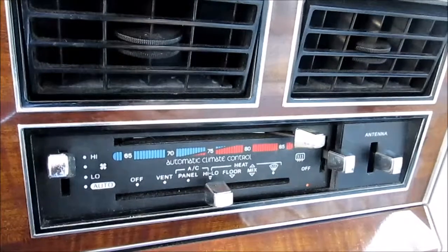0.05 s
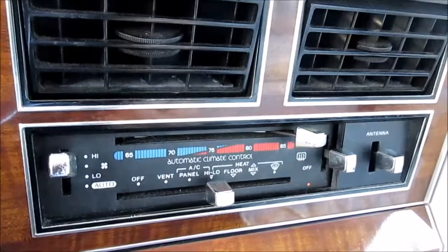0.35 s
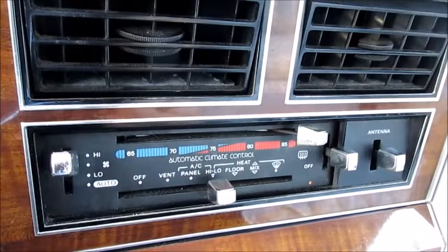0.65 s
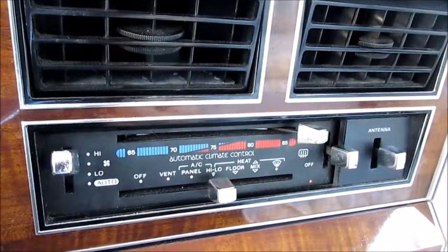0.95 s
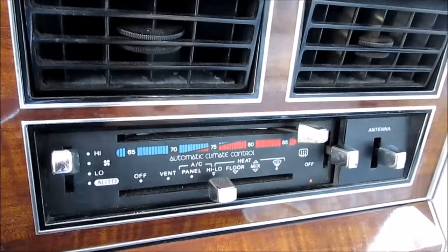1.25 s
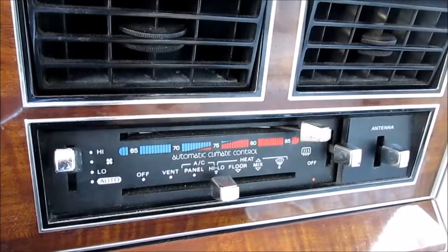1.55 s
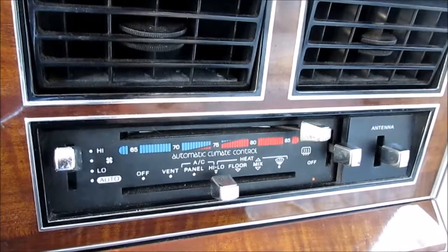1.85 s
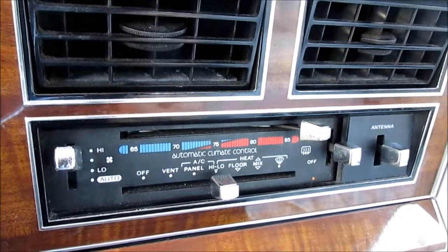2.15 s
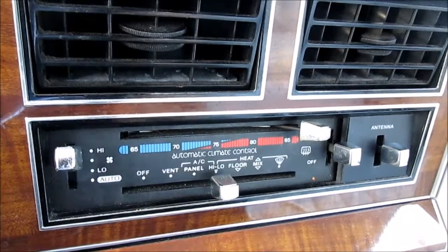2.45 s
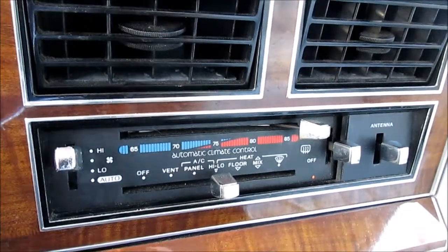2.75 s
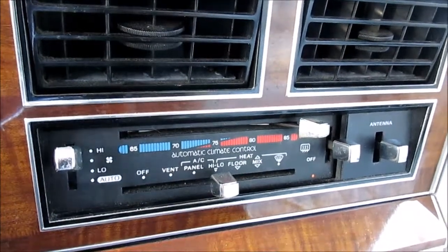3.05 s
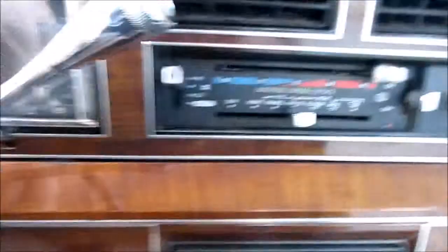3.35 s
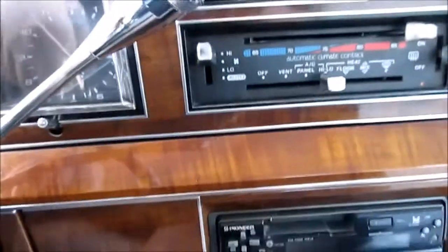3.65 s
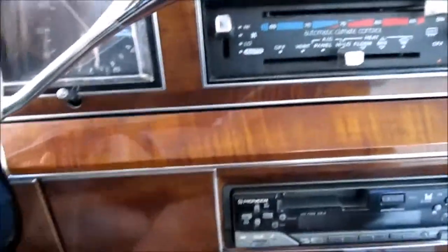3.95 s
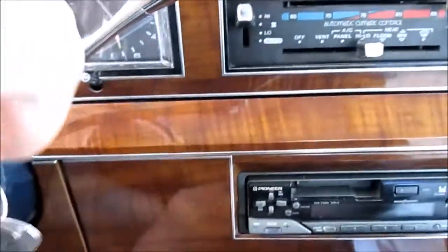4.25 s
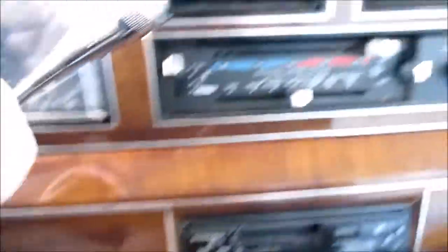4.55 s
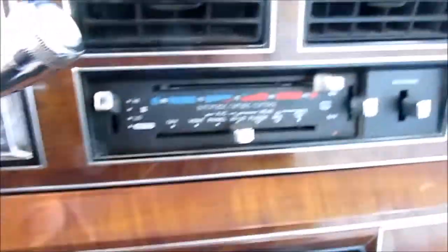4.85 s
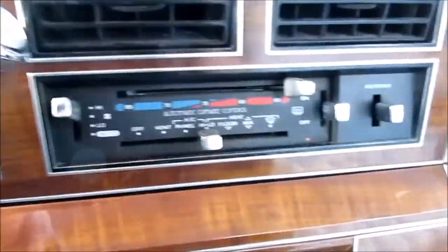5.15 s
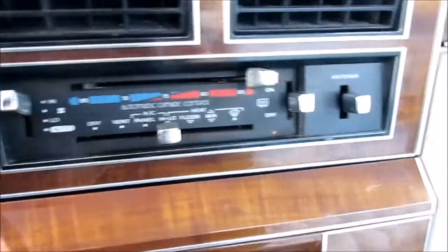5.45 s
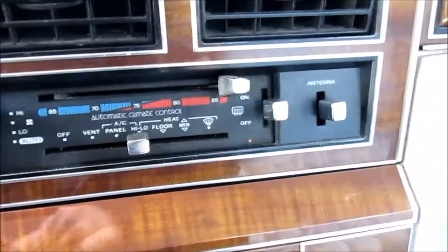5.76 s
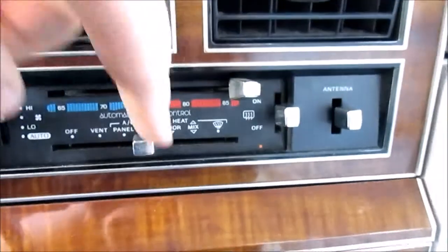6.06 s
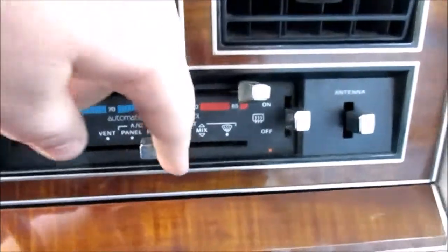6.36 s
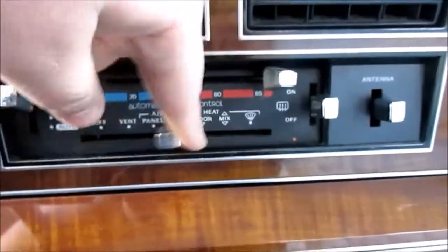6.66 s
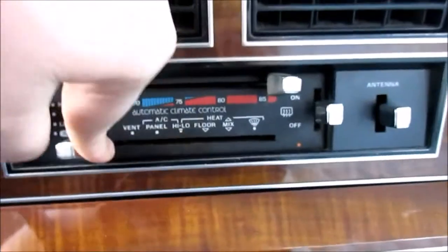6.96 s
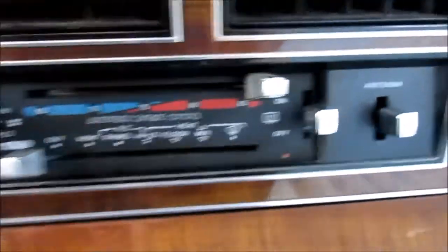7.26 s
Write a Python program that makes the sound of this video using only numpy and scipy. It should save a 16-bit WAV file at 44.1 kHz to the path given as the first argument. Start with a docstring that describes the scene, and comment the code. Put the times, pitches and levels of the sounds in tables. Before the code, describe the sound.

A steady rush of air from a car's dashboard vents covers the hum of the idling engine, with the microphone just in front of the controls. After a brief dropout, keys clink and the ignition lock clicks; the engine stalls with a thud and the blower fades away. The keys tinkle to rest. Then a sliding heater lever rattles through its notches, knocking the hollow dashboard, and a valve hisses faintly.

```python
"""In a parked car the heater blower rushes through the dashboard vents over the idling engine. The listener
moves beside the vents; the sound drops out briefly and returns with a tick. Keys jingle, the ignition lock
clicks off, the engine shudders to a stall and the fan coasts down. In the quiet cabin a finger pushes the
heater lever through its detents to the end stop, knocking the hollow dashboard; the lever's vacuum valve opens
and hisses."""
import sys
import numpy as np
from scipy import signal
from scipy.fft import irfft, next_fast_len
from scipy.io import wavfile
from scipy.ndimage import uniform_filter1d

SR = 44100
rng = np.random.default_rng(int(sys.argv[2]) if len(sys.argv) > 2 else 0)


def output_pcm(signal):
    """Save a mono or channel-first signal as 16-bit PCM at the path in sys.argv[1].

    Samples are clipped to [-1, 1] before scaling.
    """
    pcm = np.clip(np.atleast_2d(signal).T, -1, 1) * 32767
    wavfile.write(sys.argv[1], SR, np.round(pcm).astype(np.int16))


N = 322371
TIME = np.arange(N) / SR
HIT_N = round(SR * 0.26)
HIT_TIME = TIME[:HIT_N]
GAP_START_S, GAP_END_S = 3.028, 3.263
KEY_OFF_S, FAN_OFF_S = 4.17, 4.354
KEY_DAMPING = 0.3  # share of the free ring time left to touching keys

# Stereo width in the cabin. Each row: frequency in Hz, side minus mid in dB.
WIDTH = [(60, -29), (200, -24), (650, -18.5), (1300, -7.5), (2400, -7), (4400, -3), (8000, 0.5),
         (15000, -6)]
# Spectra of low rumble, dashboard hollow, lock snap and key contact.
# Each row: frequency in Hz, density in dB.
RUMBLE_COLOUR = [(25, -12), (50, -7), (95, -2.5), (140, -5.5), (160, -6.5), (190, 0), (250, -1.5),
                 (300, -10.5), (370, -7.5), (440, -15), (600, -18), (1200, -69.5)]
BOOM_COLOUR = [(100, -14), (300, -14), (420, -9), (530, -0.5), (850, -6.5), (1200, -13.5), (2000, -19),
               (6000, -39)]
LOCK_COLOUR = [(700, -15), (1050, 7), (1500, 10.5), (2100, 3), (2600, 11.5), (3200, 4.5), (6000, 5.5),
               (9000, -0.5), (14000, -1.5), (16000, -15)]
KEY_COLOUR = [(1500, -12), (4000, -9), (6500, -2.5), (7400, -6), (8400, 0), (9400, -2.5), (10400, -9),
              (11200, 3), (12000, -4), (13800, -1), (16000, -7)]
# Keys knocking together. Each row: start in s, tick in dB, ring in dB, ring time factor, struck part.
KEY_HITS = [(3.863, -26, -31.5, 1.2, "short key"), (3.880, -26, -28, 0.58, "long key"),
            (4.101, -42, -40, 0.92, "long key"), (4.184, -35, -47, .5, "tag"),
            (4.327, -25, -23, 1.2, "long key"), (4.345, -15.5, -33, 0.81, "short key"),
            (4.525, -22.5, -20.5, 0.85, "short key"), (4.550, -45, -26, 0.32, "tag"),
            (4.576, -48, -55, 0.43, "tag"), (4.639, -40, -40, 0.76, "tag"), (4.695, -30, -46, 1.1, "ring"),
            (4.774, -59, -43, 0.89, "tag"), (4.817, -56, -49, 0.78, "tag"),
            (4.853, -42, -47, 0.46, "long key"), (4.874, -59, -41, 0.51, "tag"),
            (4.891, -55, -49, 0.46, "tag"), (4.945, -60, -46, 0.74, "tag"), (4.994, -66, -58, .7, "tag"),
            (5.011, -65, -68, .5, "tag"), (5.033, -47, -50, .6, "tag"), (5.129, -43, -51.5, .8, "tag"),
            (5.171, -35, -48, .7, "short key"), (5.234, -44, -58, .4, "short key"),
            (5.329, -56, -52, 0.88, "tag"), (5.651, -47, -50, .3, "short key")]
# Modes of the bunch. Each row: frequency in Hz, relative level in dB, free t60 in s, part.
KEY_MODES = [(8115, -9, .25, "long key"), (10985, -1, .18, "long key"), (14180, -2, .22, "long key"),
             (6900, -12, .06, "long key"), (9280, -11, .09, "long key"), (13300, -9, .07, "long key"),
             (5950, -15, .05, "short key"), (8900, -11, .06, "short key"), (11200, -10, .07, "short key"),
             (14050, -8, .07, "short key"), (8230, -9, .08, "short key"), (10230, -24, .18, "short key"),
             (12492, -1, .25, "short key"), (7666, 0, .65, "ring"), (15730, -7, .3, "ring"),
             (6380, -7, .09, "tag"), (8180, -3, .1, "tag"), (9320, -6, .12, "tag"), (11040, -5, .09, "tag"),
             (14260, 2, .13, "tag")]


def undb(db):
    """Decibels to gain."""
    return np.exp(np.asarray(db) * np.log(10) / 20)


def unit(x):
    """Scale to rms 1."""
    return x / np.sqrt(np.mean(x ** 2))


def gain_at(points, hz):
    """Gain of a (Hz, dB) table on a log-frequency axis."""
    points_hz, db = np.transpose(points)
    return undb(np.interp(np.log(hz + 1), np.log(points_hz), db))


def since(start_s):
    """Seconds since start_s, zero before."""
    return np.maximum(TIME - start_s, 0)


def fade(t60_s):
    """Exponential decay of a hit."""
    return np.exp(-np.log(1000) * HIT_TIME / t60_s)


def envelope(start_s, attack_s, hold_s, t60_s):
    """Linear attack, hold, exponential release."""
    release = np.exp(-np.log(1000) * since(start_s + attack_s + hold_s) / t60_s)
    return np.minimum(since(start_s) / attack_s, 1) * release


def swells(rows):
    """Half-sine rise and fall per row."""
    return sum(undb(db) * np.sin(np.pi * np.clip((TIME - start_s) / length_s, 0, 1))
               for start_s, length_s, db in rows)


def walk(rate_hz):
    """Smooth random wander, rms 1."""
    step = int(SR / rate_hz)
    held = rng.standard_normal(1024)[np.arange(N) // step % 1024]
    return unit(uniform_filter1d(uniform_filter1d(held, step), step))


def noise(colour, size=HIT_N, modes=(), modes_db=0, apart=False, balance=None):
    """Coloured stereo noise with resonances, rms 1; bass alike on both sides unless apart."""
    hz = np.fft.rfftfreq(size, 1 / SR)
    peaks = sum(undb(db + modes_db) / (1 + (2 * (hz - centre_hz) / width_hz) ** 2)
                for centre_hz, width_hz, db in modes)
    white = rng.standard_normal((2, 2 * len(hz))).view(complex)
    mid, side = white * np.hypot(gain_at(colour, hz), peaks)
    if not apart:
        side = side * gain_at(WIDTH, hz)
    lean = np.sqrt(gain_at(balance, hz)) if balance else 1
    spectrum = np.array([(mid + side) * lean, (mid - side) / lean], np.complex64)
    return unit(irfft(spectrum, size))


def steady(colour, **options):
    """Scene-long noise."""
    return noise(colour, size=next_fast_len(N, True), **options)[:, :N]


def ring(modes, spread):
    """Decaying modes; higher ones reach the two sides more out of phase."""
    hz, db, t60_s = np.transpose(modes)[:, :, None]
    start_rad, lag_rad = rng.uniform(-np.pi, np.pi, (2, len(modes), 1))
    lag_rad = lag_rad * np.minimum(spread * gain_at(WIDTH, hz), np.pi / 4)
    amplitude = undb(db) * fade(t60_s) / np.sqrt(np.sum(undb(db) ** 2) / 2)
    phase = 2 * np.pi * hz * HIT_TIME + start_rad
    return np.array([np.sum(amplitude * np.sin(phase + side * lag_rad), axis=0) for side in (1, -1)])


def detuned(modes, share):
    """Shift each mode slightly, as the point of contact varies."""
    return [(hz * (1 + share * rng.standard_normal()), db, t60_s) for hz, db, t60_s in modes]


def add(out, start_s, sound):
    """Mix a sound in at start_s."""
    i = int(start_s * SR)
    out[:, i:i + sound.shape[-1]] += sound[..., :N - i]


def panned(sound, left_db):
    """Pan by a left-minus-right level."""
    return sound * undb(np.array([[1], [-1]]) * left_db / 2)


def from_left(sound, lag_s=0.00007):
    """Delay the right side."""
    return np.array([sound[0], np.roll(sound[1], round(lag_s * SR))])


def moved(facing, beside, start_s=2.95, length_s=0.51):
    """Glide a value as the listener moves from facing the vents to beside them."""
    return facing + (beside - facing) * np.clip((TIME - start_s) / length_s, 0, 1)


def buffeted(colour, modes=()):
    """Low noise, alike on both sides at the vents; in the draught each side has its own eddies."""
    apart_share = moved(0.01, 0.54)
    common = np.sqrt(1 - apart_share) * steady(colour, modes=modes)
    return common + np.sqrt(apart_share) * steady(colour, modes=modes, apart=True)


def cabin(level_db=-54, diffuse_db=-3):
    """Faint rumble from outside the car, partly diffuse."""
    # Cabin spectrum. Each row: frequency in Hz, density in dB.
    colour = [(25, -1), (70, 4), (150, -4), (210, 0), (320, -4), (430, -11), (750, -6), (1400, -12),
              (2300, -19), (7000, -19), (15000, -24)]
    rumble = steady(colour) + undb(diffuse_db) * steady(colour, apart=True)
    return unit(rumble) * undb(level_db + walk(58))


def return_tick(level_db=-38, t60_s=0.31):
    """Bright tick at the end of the dropout."""
    out = np.zeros((2, N))
    add(out, GAP_END_S, undb(level_db) * noise(LOCK_COLOUR) * fade(t60_s))
    return out


def thuds(rise_s=0.0014, bump_db=-5):
    """Quickly damped swings of the body panels, with a broad low bump."""
    # Bodywork thuds. Each row: start in s, level in dB, pitch in Hz, t60 in s.
    hits = [(4.241, -17, 112, 0.088), (4.248, -24, 312, 0.034), (4.657, -17, 163, 0.03),
            (5.011, -28.5, 150, 0.05), (5.166, -36, 190, .06), (5.757, -41, 210, 0.075),
            (6.095, -43, 215, .1), (6.812, -29, 264, 0.073), (6.846, -32, 101, 0.14), (6.867, -33, 75, 0.3)]
    out = np.zeros((2, N))
    attack = 1 - np.exp(-HIT_TIME / rise_s)
    for start_s, db, hz, t60_s in hits:
        swing = np.sin(2 * np.pi * hz * HIT_TIME) * fade(t60_s)
        bump = undb(bump_db) * noise(RUMBLE_COLOUR) * fade(0.049)
        add(out, start_s, undb(db) * (swing + bump) * attack)
    return out


def engine(idle_hz=56.7, run_down_s=0.62, fall_db_per_s=15.5, uneven_db=3):
    """Firing orders hum through the bulkhead; the body shudders as the engine stalls."""
    # Hum partials. Each row: multiple of the firing rate, relative level in dB.
    orders = [(1, -1), (2, 4.5), (3, -20), (4, -7)]
    # Stall spectra. Each row: frequency in Hz, density in dB.
    shudder_colour = [(25, -13.5), (45, -12), (70, -2), (115, -4), (160, -7), (300, -19), (800, -47)]
    heave_colour = [(30, -24), (60, -15), (95, 1), (125, 0), (160, -10), (300, -35), (600, -55)]
    # Body boom. Each row: frequency in Hz, width in Hz, level in dB.
    body_modes = [(105, 31, 1)]
    # Heaves on the mounts. Each row: start in s, length in s, level in dB.
    heaves = [(4.19, 0.19, -25), (4.44, .18, -33)]
    off_s = since(KEY_OFF_S)
    firing_hz = idle_hz * np.exp(-off_s / run_down_s) * (1 + 0.02 * walk(12))
    phase = 2 * np.pi * np.cumsum(firing_hz) / SR
    hum = sum(undb(db + uneven_db * walk(22.03)) * np.sin(order * phase) for order, db in orders)
    kick_db = 15 * np.exp(-((TIME - KEY_OFF_S - 0.09) / 0.066) ** 2)  # last firings hit the mounts
    hum_db = moved(-33, -38) + kick_db - fall_db_per_s * off_s
    shaking = undb(-33.5) * envelope(KEY_OFF_S, attack_s=0.072, hold_s=0.41, t60_s=0.67)
    rocking = undb(-47) * envelope(KEY_OFF_S, attack_s=0.072, hold_s=0.41, t60_s=3.4)
    shudder = buffeted(shudder_colour, modes=body_modes) * (1 + 0.5 * np.sin(phase))
    return hum * undb(hum_db) + shudder * (shaking + rocking) + steady(heave_colour) * swells(heaves)


def blower(base_db=-20.5, coast_db_per_s=19.5, duct_extra_db_per_s=4, flutter_db=0.77):
    """Turbulence rumbles, roars in the ducts and hisses at the slats; all fade as the fan coasts."""
    # Spectra of the ducts and the jet, facing and beside. Each row: frequency in Hz, density in dB.
    duct_colour = [(100, -32), (350, -8), (450, -13.5), (520, -5), (620, 1.5), (690, -5.5), (760, -8),
                   (930, -8.5), (1150, -17.5), (2000, -51.5)]
    facing_colour = [(700, -41), (1100, -1.5), (1480, 2), (1650, -1), (1850, 0.5), (2150, -7.5), (3400, -7),
                     (4600, -14.5), (7400, -13.5), (7900, -20.5), (8600, -17.5), (10300, -28.5),
                     (14500, -34.5), (16000, -59)]
    beside_colour = [(700, -38), (1100, 2.5), (1500, 5), (1850, 2), (2150, -4), (2600, -4), (3600, -8.5),
                     (5000, -11.5), (7400, -16.5), (10300, -26), (16000, -39)]
    # Air resonances. Each row: frequency in Hz, width in Hz, relative level in dB.
    duct_modes = [(519.4, 58, -1.5), (664, 88, -1.5), (810, 14, -4)]
    vent_modes = [(2590, 350, -5.5), (3350, 110, -3), (4690, 140, -3.5), (5080, 160, -8), (5860, 150, -4),
                  (7450, 75, -4.5), (8450, 360, -13)]
    # Lean of the jet. Each row: frequency in Hz, left minus right in dB.
    jet_balance = [(2400, -0.5), (4400, 4), (8100, 8), (15000, -4)]
    # Airflow at the listener. Each row: time in s, gain in dB, rumble's left minus right in dB.
    draught = [(3.0, -1.91, 0.0), (3.3, -8.5, -4), (3.85, -6.5, -7), (4.25, -7, -6.5), (4.65, -12, 2),
               (4.95, -11, -2)]
    times_s, *columns = np.transpose(draught)
    draught_db, left_db = [np.interp(TIME, times_s, column) for column in columns]
    off_s = since(FAN_OFF_S)
    facing = undb(-11.5) * steady(facing_colour, modes=vent_modes, modes_db=-5, balance=jet_balance)
    beside = undb(-13.5) * from_left(steady(beside_colour))
    rumble = undb(-0.68) * buffeted(RUMBLE_COLOUR)
    ducts = steady(duct_colour, modes=duct_modes)
    duct_db = -5 + 0.8 * walk(14) - duct_extra_db_per_s * off_s
    roar = panned(rumble, left_db) + panned(ducts * undb(duct_db), 0.37 * left_db)
    jet = np.sqrt(moved(0.94, 0)) * facing + np.sqrt(moved(0, 1)) * beside
    jet *= undb(flutter_db * walk(20))
    return (roar + jet) * undb(base_db + draught_db - coast_db_per_s * off_s)


def clicks(rows, colour, modes, ping_db, snap_t60_s, tail_db, tail_t60_s, rise_s):
    """Hard snap and ping of a part, knock of the hollow dashboard, short cabin boom."""
    # Dashboard modes. Each row: frequency in Hz, relative level in dB, t60 in s.
    dash_modes = [(284, -9.5, 0.095), (336, -5, 0.094), (523, 1, 0.1), (690, 5, 0.066), (838, -2.5, 0.088),
                  (925, 6, 0.053), (1140, 3, 0.065), (1410, 2.5, 0.045), (1940, -2, 0.064),
                  (2220, 5.5, 0.041), (3030, -5, 0.05), (3700, -9, 0.051), (5600, -12, .06),
                  (5500, -15, 0.038)]
    corner_hz, detune = 1010, 0.02
    out = np.zeros((2, N))
    attack = 1 - np.exp(-(HIT_TIME / rise_s) ** 2)
    for start_s, snap_db, knock_db in rows:
        snap = noise(colour) * (fade(snap_t60_s) + undb(tail_db) * fade(tail_t60_s))
        snap += undb(ping_db) * ring(detuned(modes, detune), spread=2.0)
        boom = undb(-13) * noise(BOOM_COLOUR) * fade(0.15)
        dull_db_per_octave = 0.094 * max(knock_db - snap_db, 0)  # little snap: soft contact
        panel = [(hz, db - dull_db_per_octave * max(np.log2(hz / corner_hz), 0), t60_s)
                 for hz, db, t60_s in dash_modes]
        knock = ring(detuned(panel, detune), spread=0.68) + boom
        add(out, start_s - rise_s, (undb(snap_db + 9.5) * snap + undb(knock_db) * knock) * attack)
    return out


def ignition_lock():
    """The lock clicks round; a small catch drops after the engine has stopped."""
    # Clicks. Each row: time in s, relative snap level in dB, dashboard knock in dB.
    lock_hits = [(3.787, -47.5, -51), (3.864, -34, -44), (4.138, -29.5, -43), (4.287, -40, -46),
                 (4.351, -33.5, -48), (4.688, -51, -34)]
    catch_hits = [(5.713, -46, -51)]
    # Pings. Each row: frequency in Hz, relative level in dB, t60 in s.
    lock_modes = [(2590, 0, 0.069), (5140, 1, 0.048), (7100, -5, .05), (8140, 1, 0.036), (9400, -13, 0.027)]
    catch_modes = [(940, -6, 0.24), (3270, 1, 0.032), (3620, 7, 0.029), (4810, -4, .03), (5540, -8, .03)]
    lock = clicks(lock_hits, LOCK_COLOUR, lock_modes, ping_db=-8, snap_t60_s=0.024,
                  tail_db=-7.5, tail_t60_s=0.14, rise_s=0.002)
    catch = clicks(catch_hits, LOCK_COLOUR, catch_modes, ping_db=1.5, snap_t60_s=0.017,
                   tail_db=-13.5, tail_t60_s=0.39, rise_s=0.00124)
    return from_left(panned(lock, left_db=-1.5) + catch)


def tag_touches(start_s=4.55, touches_per_s=45, level_db=-49, t60_s=4.5, scatter_db=4):
    """The released bunch swings for a second; light touches tick and ring the damped tag."""
    out = np.zeros((2, N))
    for k, (jitter, strength) in enumerate(rng.random((touches_per_s, 2))):
        age_s = (k + jitter) / touches_per_s
        modes = [(hz, db + scatter_db * rng.standard_normal(), KEY_DAMPING * free_s)
                 for hz, db, free_s, part in KEY_MODES if part == "tag"]
        tick = undb(-3) * noise(KEY_COLOUR) * fade(0.012)
        tinkle = ring(detuned(modes, 0.014), spread=1.7)
        touch_db = level_db + scatter_db * (2 * strength - 1) - 60 * age_s / t60_s
        add(out, start_s + age_s, undb(touch_db) * (tick + tinkle))
    return out


def key_rattle(contacts_per_s=300, stir_db=-29.5, ring_db=-8):
    """Keys slide over each other in tiny contacts after each knock, damped by their neighbours."""
    # Keys sliding along their ring. Each row: start in s, length in s, level in dB.
    slides = [(3.850, 0.021, -38), (4.131, 0.012, -26), (4.320, 0.012, -34), (4.66, 0.056, -39),
              (5.228, .055, -47), (5.345, 0.045, -53), (5.47, .07, -61), (4.37, 0.21, -51)]
    stirred = sum(undb(tick_db + stir_db) * envelope(start_s, attack_s=0.008, hold_s=0, t60_s=0.7)
                  for start_s, tick_db, *_ in KEY_HITS)
    contacts = (rng.random(N) < contacts_per_s / SR) * undb(1.4 * rng.standard_normal(N))
    scrape = steady(KEY_COLOUR) * signal.oaconvolve(contacts, fade(0.12))[:N]
    damped = [(hz, db, KEY_DAMPING * t60_s) for hz, db, t60_s, part in KEY_MODES if part != "ring"]
    tinkle = signal.oaconvolve(contacts[None], ring(damped, spread=0.94))[:, :N]
    return (unit(scrape) + undb(ring_db) * unit(tinkle)) * (stirred + swells(slides))


def key_clinks(pieces=3, chance=0.8, low_hz=7800, high_hz=15000, max_delay_s=0.07, t60_s=0.045):
    """Knocks throw small loose pieces together; each clink has three random pitches."""
    out = np.zeros((2, N))
    for start_s, tick_db, *_ in KEY_HITS:
        for draw, delay, strength, *pitches in rng.random((pieces, 6)):
            if draw < chance:
                modes = [(low_hz + (high_hz - low_hz) * pitch, 0, t60_s) for pitch in pitches]
                clink_db = tick_db - 18 + 3 * (2 * strength - 1)
                add(out, start_s + delay * max_delay_s, undb(clink_db) * ring(modes, spread=1.7))
    return out


def key_knocks(sympathy_db=-17, rise_s=0.0011, scatter_db=3, tick_t60_s=0.035, tag_detune=0.007):
    """Bright ticks; the struck part rings, differently at each contact, the bunch faintly with it."""
    out = np.zeros((2, N))
    attack = 1 - np.exp(-HIT_TIME / rise_s)
    for start_s, tick_db, ring_db, t60_factor, struck in KEY_HITS:
        contact_db = scatter_db * rng.standard_normal(len(KEY_MODES))
        modes = [(hz, db + extra_db + sympathy_db * (part != struck), t60_factor * t60_s)
                 for (hz, db, t60_s, part), extra_db in zip(KEY_MODES, contact_db)
                 if part != "ring" or struck == "ring"]
        modes = detuned(modes, tag_detune * (struck == "tag"))
        tick = undb(tick_db) * noise(KEY_COLOUR) * fade(tick_t60_s)
        add(out, start_s, (tick + undb(ring_db) * ring(modes, spread=1.7)) * attack)
    return out


def valve(leak_db=-49.5):
    """Air leaks through the lever's vacuum valve, hardest just after each jolt."""
    # Hiss spectrum. Each row: frequency in Hz, density in dB.
    colour = [(600, -1.5), (1500, -3), (2300, -3.5), (3000, -3.5), (4200, -7), (5300, -3), (6400, -12),
              (9200, -1), (10900, -13), (12500, -8), (13500, 0), (15000, 2), (16000, -13)]
    # Jolts opening the valve. Each row: start in s, extra rush in dB, settling time in s.
    jolts = [(6.86, 8, 0.024), (7.113, 16, 0.05)]
    rush_db = sum(db * (TIME > start_s) * np.exp(-since(start_s) / settle_s)
                  for start_s, db, settle_s in jolts)
    is_open = TIME > jolts[0][0]
    return steady(colour) * is_open * undb(leak_db + rush_db + 0.33 * walk(25))


def lever_drag():
    """Friction of the lever in its slot, heard through the hollow dashboard."""
    # Drags. Each row: start in s, length in s, level in dB.
    drags = [(6.312, 0.057, -43.5), (6.528, 0.017, -41), (6.692, 0.031, -42.5), (6.72, 0.023, -33),
             (7.029, 0.061, -40)]
    return steady(BOOM_COLOUR) * swells(drags)


def lever_judder(attack_s=0.0018, release_t60_s=0.01, waver=0.0264):
    """Bursts of stick and slip drive one panel resonance."""
    # Bursts. Each row: start in s, length in s, pitch in Hz, level in dB.
    bursts = [(6.741, .006, 810, -17), (6.754, .012, 835, -16), (6.770, .008, 850, -16),
              (6.812, .007, 780, -19)]
    phase_per_hz = 2 * np.pi * np.cumsum(1 + waver * walk(300)) / SR
    return sum(undb(db) * np.sin(hz * phase_per_hz)
               * envelope(start_s, attack_s, length_s - attack_s, release_t60_s)
               for start_s, length_s, hz, db in bursts)


def spring_scrape(colour, catches_per_s=900, catch_t60_s=0.0039, scatter_db=3):
    """The lever's spring catches and slips on the detent plate in dense tiny snaps."""
    # Scrapes. Each row: start in s, length in s, level in dB.
    scrapes = [(6.724, .016, -46), (6.737, 0.061, -27), (6.801, 0.0204, -20), (6.859, 0.016, -36),
               (7.12, 0.045, -48)]
    catches = (rng.random(N) < catches_per_s / SR) * undb(scatter_db * rng.standard_normal(N))
    grain = signal.oaconvolve(catches, fade(catch_t60_s))[:N]
    return unit(steady(colour) * grain) * swells(scrapes)


def heater_lever():
    """The lever snaps and scrapes through its detents, hits the end stop and springs back."""
    # Finger taps and detents; end stop.
    # Each row: time in s, relative snap level in dB, dashboard knock in dB.
    detent_hits = [(6.322, -53, -33.5), (6.531, -41.5, -31), (6.728, -34, -35), (6.741, -16.5, -15.5),
                   (6.754, -38, -19.5), (6.769, -18, -14.5), (6.779, -20, -26), (6.803, -35, -22),
                   (6.808, -16, -15.5), (6.814, -41, -14.5), (7.066, -55, -38)]
    stop_hits = [(6.857, -34.5, -47), (6.868, -24, -28.5), (7.111, -32, -45)]
    # Snap spectra. Each row: frequency in Hz, density in dB.
    detent_colour = [(600, -27), (1200, 7), (2100, 3.5), (2800, 0), (3600, 0), (5400, 4), (7000, -5.5),
                     (9000, -1.5), (12000, -10), (16000, -10)]
    stop_colour = [(700, -2), (1350, 6), (2000, -1), (5000, 1), (6500, 1.5), (9000, 1.5), (12000, 3.5),
                   (16000, 2.5)]
    # Pings. Each row: frequency in Hz, relative level in dB, t60 in s.
    detent_modes = [(1850, 1, 0.034), (2310, -9, 0.055), (4400, 0, .02), (5190, 6, 0.016)]
    stop_modes = [(1430, -10, 0.05), (3480, -2, .02), (4410, 4, 0.027), (5440, 3, .025), (6500, -3, .025),
                  (6900, 3, .02)]
    detents = clicks(detent_hits, detent_colour, detent_modes, ping_db=-9, snap_t60_s=0.018,
                     tail_db=-20, tail_t60_s=0.1, rise_s=0.0021)
    stop = clicks(stop_hits, stop_colour, stop_modes, ping_db=-5.5, snap_t60_s=0.013,
                  tail_db=-5.5, tail_t60_s=0.064, rise_s=0.0012)
    return detents + stop + lever_judder() + spring_scrape(detent_colour) + lever_drag()


def scene():
    """Stereo mix just in front of the dashboard."""
    lock = ignition_lock()
    controls = panned(heater_lever() + valve(), left_db=-0.5)
    keys = panned(key_knocks() + key_clinks() + key_rattle() + tag_touches(), left_db=3)
    return cabin() + return_tick() + thuds() + engine() + blower() + lock + keys + controls


def record(dry):
    """The microphone loses the deepest bass, the sound drops out briefly, the top is cut."""
    low_hz, top_hz = 22, 15900
    thinned = signal.sosfilt(signal.butter(2, low_hz, "highpass", fs=SR, output="sos"), dry)
    live = (TIME < GAP_START_S) | (TIME > GAP_END_S)
    gate = uniform_filter1d(live.astype(float), size=128)
    return signal.sosfilt(signal.ellip(10, 0.2, 80, top_hz, fs=SR, output="sos"), thinned * gate)


dry = scene()
out = record(dry)
output_pcm(out)
```